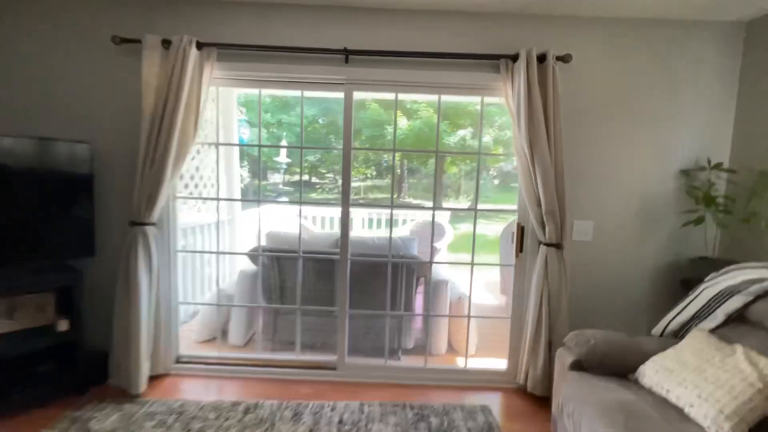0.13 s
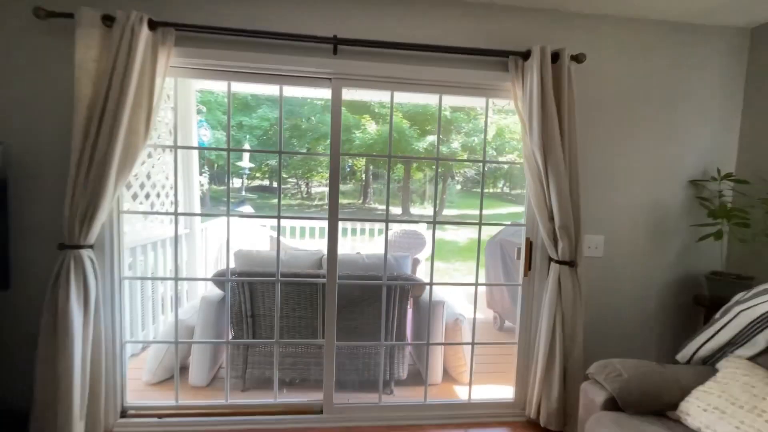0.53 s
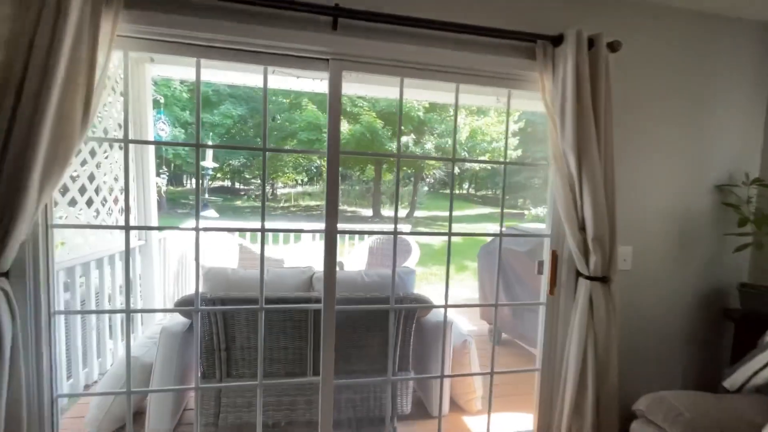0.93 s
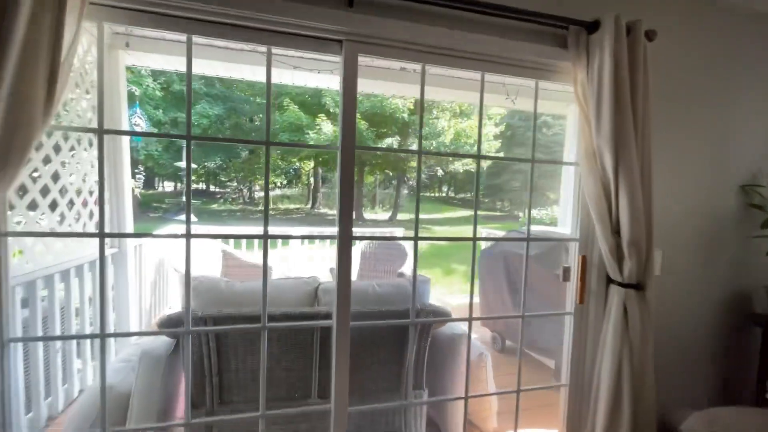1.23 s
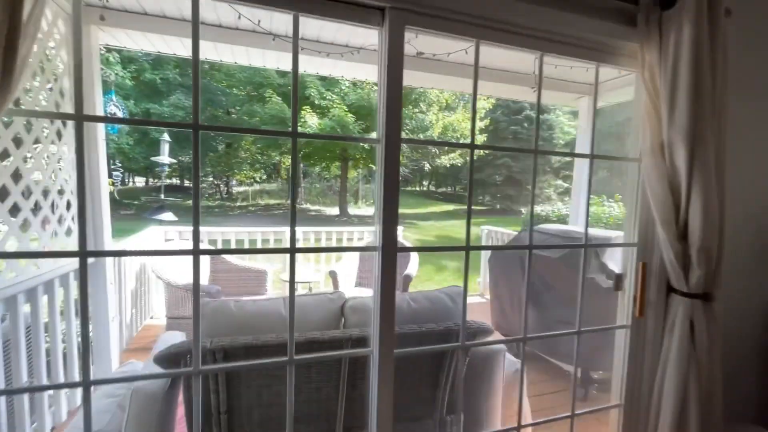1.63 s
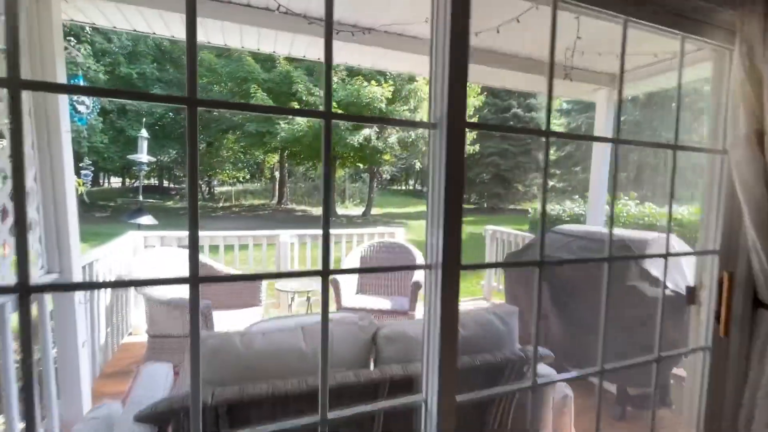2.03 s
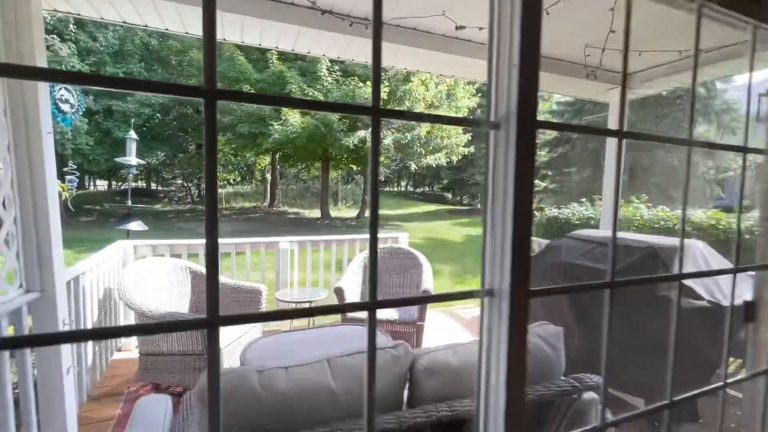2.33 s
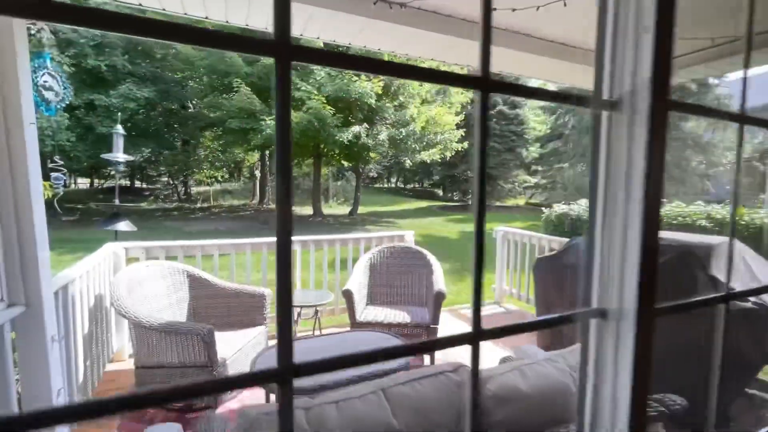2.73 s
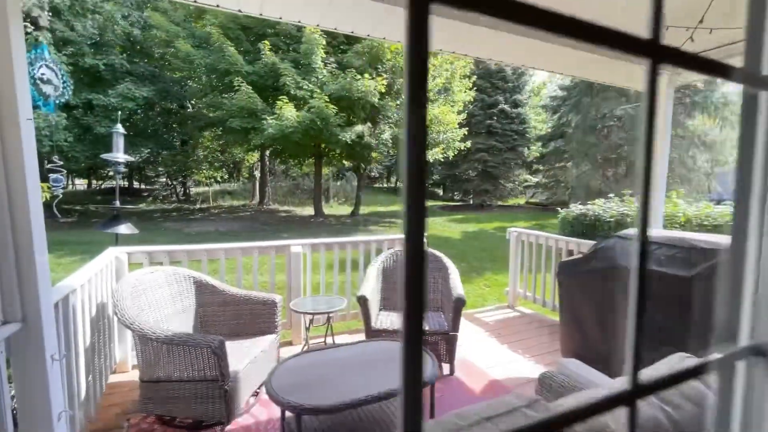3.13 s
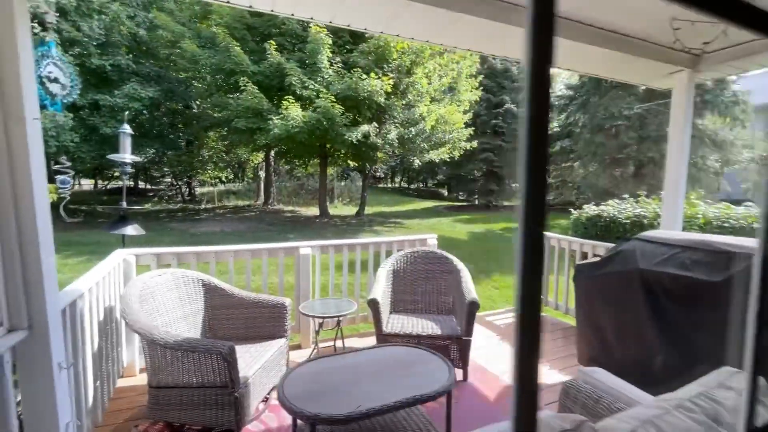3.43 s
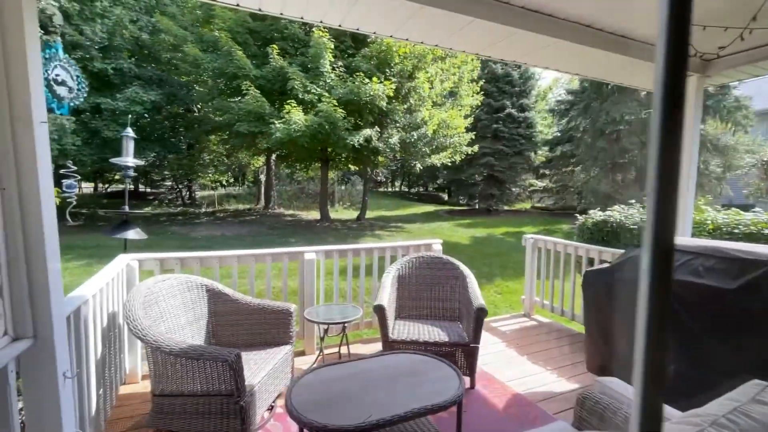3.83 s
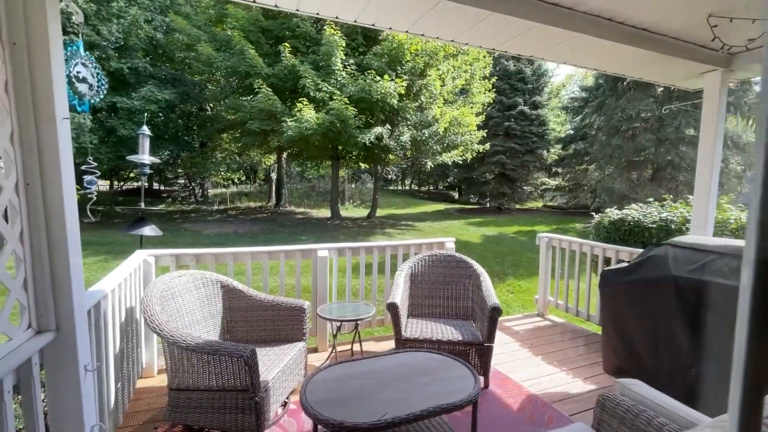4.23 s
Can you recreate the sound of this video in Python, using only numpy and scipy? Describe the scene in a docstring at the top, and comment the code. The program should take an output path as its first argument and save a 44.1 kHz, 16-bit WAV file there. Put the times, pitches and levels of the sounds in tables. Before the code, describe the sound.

One loud hollow door thud with low rumbling ring, then someone quietly shuffling across the floor with soft knocks and brushing over faint hiss.

```python
"""Door slam and slow steps

A door out of sight swings shut in a quiet house: its hinge squeaks as a wavering tone, air rushes, the latch and
leaf rattle as shaped noise bursts, and the low room modes ring as damped sines that boom and beat.
Someone then walks slowly over floor and rug: swelling noise makes rustling cloth and soles, short bursts of grit
make scuffs, damped sines make soft knocks in the boards. A faint steady hiss lies under it all."""
import sys
import numpy as np
from scipy import signal
from scipy.fft import rfft, irfft, next_fast_len
from scipy.io import wavfile

SR = 44100
rng = np.random.default_rng(int(sys.argv[2]) if len(sys.argv) > 2 else 0)


def digitize_waveform(pressure):
    """Quantize a signal to 16-bit integers and store it at the path in sys.argv[1].

    Rows of a 2-D input are taken as channels; values are limited to [-1, 1].
    """
    field = np.atleast_2d(pressure).T
    bounded = np.clip(field, -1, 1)
    quanta = np.round(bounded * 32767).astype(np.int16)
    wavfile.write(sys.argv[1], SR, quanta)


N = 193863
T = np.arange(N) / SR


def from_db(db):
    """Decibels to gain."""
    return 10 ** (np.asarray(db) / 20)


def rms_one(x):
    """Scale to rms 1."""
    return x / np.sqrt(np.mean(x ** 2) + 1e-30)


def in_time(rows):
    """Columns of a table, joined by straight lines in time."""
    s, *columns = np.transpose(rows)
    return [np.interp(T, s, c) for c in columns]


def at_hz(points, hz):
    """A spectrum read on a log-frequency axis."""
    p = np.array(points, float)
    return np.interp(np.log(np.maximum(hz, 1)), np.log(p[:, 0]), p[:, 1])


def colour(x, spectrum):
    """Filter by a spectrum in dB."""
    length = x.shape[-1]
    size = next_fast_len(length)
    gain = from_db(at_hz(spectrum, np.fft.rfftfreq(size, 1 / SR)))
    return irfft(rfft(x, size) * gain, size)[..., :length]


def drift(rate_hz):
    """Slow chance with spread 1: noise through two equal low-pass poles, computed every 40 samples."""
    r = np.exp(-2 * np.pi * rate_hz * 40 / SR)
    noise = rng.standard_normal(N // 40 + 2002)
    slow = signal.lfilter([1], [1, -2 * r, r * r], noise)[2000:]   # settled part only
    return np.interp(np.arange(N) / 40, np.arange(len(slow)), rms_one(slow))


def ring(x, hz, t60):
    """A unit click sets a sine of height 1 ringing; it falls 60 dB in t60 seconds."""
    r, w = from_db(-60 / (t60 * SR)), 2 * np.pi * hz / SR
    return signal.lfilter([0, np.sin(w)], [1, -2 * r * np.cos(w), r * r], x + 1e-18)


def resonance(x, hz, width):
    """One peak with gain 1 on top, its width in Hz."""
    r = np.exp(-np.pi * width / SR)
    feedback = [1, -2 * r * np.cos(2 * np.pi * hz / SR), r * r]
    return signal.lfilter(np.array([1, 0, -1]) * (1 - r * r) / 2, feedback, x)


def burst(start, t60, rise_s, span=slice(None)):
    """Envelope: silent, a quick rise, an even fall in dB."""
    t = np.maximum(T[span] - start, 0)
    return (1 - np.exp(-t / rise_s)) * from_db(-60 * t / t60)


def after(s):
    """The samples in which a short sound from s on is heard."""
    return slice(int(s * SR), int((s + .6) * SR))


def swells(arrive_s, rise_s, hold_s, fall_s, level_db):
    """Power of each swell (rows) every 32 samples: an even rise in dB, a hold, an even fall."""
    columns = (arrive_s, rise_s, hold_s, fall_s, level_db)
    arrive, rise, hold, fall, level = (np.reshape(c, (-1, 1)) for c in columns)
    t = T[::32] - arrive
    drop_db = 20 * (np.maximum(-t, 0) / rise + np.maximum(t - hold, 0) / fall)
    return from_db(2 * (level - drop_db))   # twice the dB gives power


def together(powers):
    """Overlapping swells add in power; returns a gain."""
    return np.interp(T, T[::32], np.sqrt(powers.sum(axis=0)))


# how alike left and right microphone hear diffuse sound: freq_hz, likeness (1 same, 0 unrelated, -1 opposed)
LIKENESS = [(60, 0.23), (130, 0.91), (290, 0.7), (640, -0.2), (1410, -0.13), (3100, 0.0065), (6820, -0.33),
            (15000, 0.25)]


def stereo_noise(size):
    """White noise in two channels, mixed from mid and side: most alike in the bass, little in the treble."""
    mid, side = rfft(rng.standard_normal((2, size)))
    alike = np.clip(at_hz(LIKENESS, np.fft.rfftfreq(size, 1 / SR)), -1, 1)
    return irfft(np.sqrt(1 + alike) * mid + np.sqrt(1 - alike) * side * np.array([[1], [-1]]), size)


def grainy(spectrum, grain_db=0, rate_hz=4):
    """Coloured stereo noise, rms 1; any grain makes its strength flicker like fibres catching."""
    return rms_one(colour(stereo_noise(N) * from_db(grain_db * drift(rate_hz)), spectrum))


# how long the house rings, before the stretch each sound gives it: freq_hz, t60_s
HOUSE = [(150, 0.58), (400, 0.76), (1040, 0.63), (2760, 0.55), (7280, 0.42)]


def room(x, stretch, build_s):
    """Diffuse echoes: noise that builds up, then dies band by band; energy 1 per channel."""
    t, white, echoes = T[:SR], stereo_noise(SR), 0
    edges = 25 * 2 ** np.arange(1.5, 9.6, .5)   # half octaves, Hz
    for low, high in zip(edges, edges[1:]):
        band = signal.sosfilt(signal.butter(2, [low, high], "band", fs=SR, output="sos"), white)
        fade = from_db(-60 * t / (stretch * at_hz(HOUSE, np.sqrt(low * high))))
        echoes = echoes + band * fade / np.sqrt(np.sum(fade ** 2))
    echoes = echoes * (1 - np.exp(-t / build_s))
    return signal.fftconvolve(np.atleast_2d(x), echoes / np.sqrt(np.sum(echoes ** 2) / 2), axes=1)[:, :N]


# hinge squeak, out of sight: time_s, pitch_hz, level_db and octave_db (both before the flutter's 2.5 dB lift)
SQUEAK = [(0, 5130, -54, -80), (.05, 5200, -51, -67), (.1, 5225, -57, -71), (.14, 5235, -63, -86),
          (.22, 5225, -72, -100)]


def squeak():
    """Uneven slipping in the hinge: a thin wavering tone and its octave, fluttering apart at the two ports."""
    hz, level_db, octave_db = in_time(SQUEAK)
    wander = 1.2 * np.array([drift(25), drift(25)])   # radians, one row per port
    phase = 2 * np.pi * np.cumsum(hz + 30 * drift(120)) / SR + wander
    tone = from_db(level_db) * np.sin(phase) + from_db(octave_db) * np.sin(2 * phase)
    return tone * from_db(2.5 + 2.0 * drift(48)) * (T < SQUEAK[-1][0])


# colour of the faint hiss under the quiet house: freq_hz, relative_db
HISS = [(59, -48.5), (100, -9), (150, 3), (166, -11.5), (461, -16), (521, -12), (2350, -17.5),
        (2600, -17.5), (3680, -26.5), (8480, -19.5), (13000, -34.5)]


def hiss():
    """Steady coloured noise at one faint level."""
    return from_db(-76) * grainy(HISS)


# the leaf swings: time_s, push_db on the lowest room modes, rush_db of air
SWING = [(0, -105, -60), (.09, -89, -52.5), (.14, -74, -55), (.2, -69.5, -55), (.25, -71.5, -46.5),
         (.45, -120, -65.5)]
# colour of the rushing air: freq_hz, relative_db
RUSH = [(70, -35.5), (120, -8), (230, -4), (1300, -7.5), (3500, -19), (5600, -21), (10500, -31),
        (12500, -58.5)]


def rush():
    """Air swept by the leaf: coloured noise that follows the swing."""
    return from_db(in_time(SWING)[1]) * grainy(RUSH) * (T < SWING[-1][0])


# low modes of the rooms: pitch_hz, level_db of a 0 dB thump, t60_s, sign where the microphone stands
ROOM_MODES = [(36.1, -30.9, 1.68, -1), (42.9, -34.6, 2.02, 1), (50.9, -35.9, 2.07, -1),
              (57.7, -29, 1.79, 1), (72.3, -33.3, .58, 1), (89.4, -6.5, .24, -1), (94.1, -3.3, .46, 1),
              (105, -15.5, .27, -1)]
# the leaf lands and rebounds: time_s, push_db
THUMPS = [(.2237, -28.3), (.2594, 2.3), (.2754, 2.4), (.3332, -7)]


def boom():
    """The leaf pushes air while it swings and thumps it as it lands; the room modes ring and beat."""
    swing = from_db(in_time(SWING)[0]) * rng.standard_normal(N) * (T < SWING[-1][0])
    thumps = np.zeros(N)
    for s, push_db in THUMPS:
        thumps[round(s * SR)] = from_db(push_db)
    modes = []
    for hz, level_db, t60, sign in ROOM_MODES:
        drive = swing * (hz < 60) + from_db(level_db) * thumps   # the swing moves only the lowest modes
        modes.append(sign * ring(drive, hz, t60))
    across = from_db(-18.0) * (modes[3] - modes[2] + .8 * modes[7])   # modes that differ between the two ports
    return sum(modes) + across * np.array([[1], [-1]])


# rumble in the floor structure while someone walks: time_s, level_db
RUMBLE = [(1.9, -66.5), (2.05, -74.5), (2.2, -84), (2.43, -67), (2.83, -75), (2.9, -82), (3.06, -70),
          (3.23, -80), (3.36, -71), (3.67, -65.5), (3.8, -80.5), (3.99, -65.5), (4.22, -69.5),
          (4.39, -79.5)]
# colour of the joists: freq_hz, relative_db
JOISTS = [(16, -39), (28, -10), (54, 0), (92, -3), (110, -6.5), (140, -29.5), (240, -120)]


def rumble():
    """Low flickering noise in the joists, fading in from the start until the first row of its table."""
    fade_in = np.clip(T / RUMBLE[0][0], 0, 1)
    return fade_in * from_db(in_time(RUMBLE)[0]) * grainy(JOISTS, grain_db=2.0, rate_hz=7.6)


# contacts of the door with the frame: start_s, relative_db, rattle t60_s, bass_db (gain in the bass)
CONTACTS = [(0.2154, -20.5, 0.29, -13.5), (0.252, -12, 0.085, 2.5), (0.265, -14, 0.12, 7),
            (0.291, -23.5, 0.49, 3.5)]
# resonances of the leaf: pitch_hz, width_hz, peak_db over the rattle
DOOR_MODES = [(150, 12, 7), (199.5, 8.3, 6), (226.5, 34, -3), (345, 12, 1.5), (387, 14, 8), (1527, 89, 5.5)]
# colour of the slam: freq_hz, relative_db
DOOR = [(74, -31), (125, -7.5), (312, -17), (381, -22.5), (421, -21.5), (1010, -23.5), (1090, -21.5),
        (1310, -21.5), (1950, -25.5), (3010, -25.5), (9360, -33), (11900, -49.5), (14500, -56)]


def slam():
    """Each contact rattles latch and leaf; the first arrivals are sharp, then the house carries it on."""
    chatter_db = np.clip(2.5 * drift(90) + 2.5 * drift(450), -9, 5)   # loose parts chatter unevenly
    chatter = rng.standard_normal(N) * from_db(chatter_db)
    dull = signal.sosfilt(signal.butter(1, 1200, fs=SR, output="sos"), chatter)
    rattle = np.zeros(N)
    for s, level_db, t60, bass_db in CONTACTS:
        tilted = chatter + (from_db(bass_db) - 1) * dull
        rattle += from_db(level_db) * burst(s, t60, rise_s=0.0022) * tilted
    body = rattle + sum(from_db(peak_db) * resonance(rattle, hz, width) for hz, width, peak_db in DOOR_MODES)
    early = from_db(-8.5) * rattle * stereo_noise(N)   # unlike at the two ports
    return from_db(22) * colour(early + room(body, stretch=0.83, build_s=0.0018), DOOR)


BOARD_HZ = np.geomspace(110, 520, 8)   # resonances of the floor


def boards(pitch_hz):
    """The floor's resonances murmur; those nearest the given pitch sound most."""
    load = stereo_noise(N) * from_db(2.8 * drift(5.3))
    murmur = 0
    for hz in BOARD_HZ:
        nearness = np.exp(-(np.log(pitch_hz / hz) / 0.47) ** 2)
        width = 0.45 * hz
        murmur = murmur + nearness * resonance(resonance(load, hz, width), hz, width) / np.sqrt(hz)
    return rms_one(murmur)


# low murmur under the slam's tail (first row), then the walker's weight shifts:
# arrive_s, rise_s (over 20 dB), hold_s, fall_s (over 20 dB), murmur_db, pitch_hz, rub_db
MURMUR_AND_STEPS = [(.5, .05, .05, 1.2, -56, 190, -63), (.922, .012, .04, .2, -60, 200, -58),
                    (1.14, .2, .04, .1, -54, 390, -57.5), (1.25, .05, .02, .22, -61, 158, -73),
                    (1.445, .015, .09, .07, -60, 250, -70), (1.655, .025, .16, .15, -65, 320, -66),
                    (1.75, .2, .05, .15, -61, 320, -61), (1.89, .02, .06, .08, -68, 337, -69),
                    (2.24, .04, .05, .4, -65, 310, -69), (2.38, .14, .04, .2, -51, 410, -56),
                    (2.48, .15, .07, .2, -61, 340, -60), (2.772, .005, .04, .2, -70, 232, -59),
                    (2.97, .25, .03, .2, -65.5, 240, -65), (3.05, .04, .04, .12, -57, 317, -55),
                    (3.125, .015, .05, .2, -62, 200, -50), (3.24, .03, .02, .05, -56, 248, -59),
                    (3.305, .02, .04, .08, -57, 180, -62), (3.4, .1, .05, .2, -65, 200, -62),
                    (3.587, .02, .03, .15, -55, 340, -65), (3.64, .05, .02, .09, -53, 280, -55),
                    (3.936, .005, .1, .2, -59, 190, -72), (4.0, .04, .05, .2, -62, 170, -68)]
# cloth and soles brush: arrive_s, rise_s (over 20 dB), hold_s, fall_s (over 20 dB), rasp_db, swish_db
RUSTLES = [(.69, .05, .05, .3, -67, -67), (.922, .012, .05, .15, -61, -70), (1.14, .2, .04, .25, -68, -77),
           (1.34, .06, .1, .2, -66, -70), (1.66, .05, .15, .3, -76, -84), (1.885, .015, .07, .06, -68, -68),
           (2.22, .02, .06, .2, -72, -68), (2.46, .2, .04, .2, -60.5, -68), (2.54, .03, .03, .3, -62, -68),
           (2.774, .01, .05, .35, -60, -68), (3.05, .04, .03, .15, -59, -74),
           (3.122, .012, .05, .18, -50, -61), (3.305, .012, .03, .25, -58, -69),
           (3.467, .015, .03, .25, -63, -72), (3.587, .025, .03, .08, -54, -63),
           (3.7, .1, .04, .4, -70, -67), (3.96, .01, .13, .08, -67, -78)]
# colours of the dull rub, the drier rasp and the bright swish: freq_hz, relative_db
RUB = [(290, -39), (500, -2), (579, -1.5), (850, 6.5), (1450, -4.5), (1880, -11.5), (3190, -120)]
RASP = [(760, -7.5), (1300, 0.5), (2050, -2), (2410, -3.5), (3300, -14.5), (4290, -15), (7260, -120)]
SWISH = [(1760, -40), (3000, -10.5), (5810, -14), (6300, -13.5), (7760, -17.5), (8970, -14), (12600, -41),
         (13500, -38)]


def murmur_and_walk():
    """A low murmur under the slam's tail, then boards under load; a dull rub, a drier rasp, a bright swish."""
    s, rise_s, hold_s, fall_s, murmur_db, hz, rub_db = np.transpose(MURMUR_AND_STEPS)
    murmur = swells(s, rise_s, hold_s, fall_s, murmur_db) + 1e-30
    pitch_hz = np.interp(T, T[::32], hz @ murmur / murmur.sum(axis=0))   # the strongest swell counts most
    rub = swells(s, rise_s, hold_s, .7 * fall_s, rub_db)   # dies sooner than the murmur
    *shape, rasp_db, swish_db = np.transpose(RUSTLES)
    out = together(murmur) * boards(pitch_hz)
    out += together(rub) * grainy(RUB, grain_db=0.5, rate_hz=26)
    out += together(swells(*shape, rasp_db)) * grainy(RASP, grain_db=1.0, rate_hz=45)
    out += together(swells(*shape, swish_db)) * grainy(SWISH, grain_db=2.0, rate_hz=26)
    return out


# scuffs of a sole: start_s, level_db, pitch_hz of the hollow note, edge_db (bright edge), t60_s of the hollow rasp,
# tap_db relative to level_db
SCUFFS = [(0.917, -61, 1670, -87, 0.14, -1), (1.135, -38, 820, -104, 0.16, -16),
          (1.877, -62, 914, -62, 0.033, 0), (1.889, -46, 845, -58.5, 0.034, -18),
          (2.21, -78, 727, -83, 0.14, -9), (2.452, -46.5, 1590, -72.5, 0.29, -7.5),
          (2.53, -46.5, 1710, -64, 0.077, -7.5), (2.769, -41.5, 829, -70, 0.36, -23),
          (3.118, -54, 1190, -59, 0.1, 4.5), (3.302, -39, 877, -87, 0.1, -10.5),
          (3.466, -51, 1252, -75, 0.15, 1.5), (3.576, -38.5, 1760, -62.5, 0.21, -21),
          (3.64, -45, 650, -77, 0.035, -7), (3.846, -57.5, 2150, -101, 0.084, -9),
          (3.955, -48.5, 2150, -94, 0.45, -13.5), (4.018, -61, 2395, -94, 0.078, -2)]


def scuffs():
    """Sudden bursts of grit: a sine tap, a hollow rasp at its pitch, and a bright edge that dies more slowly."""
    rise_s, pan_db, grit_db = 0.00068, 3, -18   # left over right; rasp relative to level_db
    out, grit = np.zeros(N), rng.standard_normal(N) * from_db(3.3 * drift(290))
    edge = rms_one(colour(grit, SWISH))
    for s, level_db, hz, edge_db, t60, tap_db in SCUFFS:
        width, span = .3 * hz, after(s)
        hollow = rms_one(resonance(resonance(grit[span], hz, width), hz, width))
        rasp = from_db(grit_db) * hollow * burst(s, t60, rise_s, span)
        tap = from_db(tap_db) * np.sin(2 * np.pi * hz * (T[span] - s)) * burst(s, 0.082, 0.00057, span)
        out[span] += from_db(level_db) * (tap + rasp)
        out[span] += from_db(edge_db) * edge[span] * burst(s, 2.1 * t60, rise_s, span)
    return from_db(pan_db / 2 * np.array([[1], [-1]])) * out


# knocks in the boards: start_s, level_db, pitch_hz, t60_s
KNOCKS = [(0.927, -48, 97, 0.18), (1.444, -42.5, 144, 0.1), (1.465, -38.5, 152, 0.11),
          (1.889, -49, 350, 0.047), (2.325, -47, 334, 0.088), (2.395, -40.5, 453.3, 0.14),
          (2.543, -48.5, 322, 0.061), (3.055, -47, 328.6, 0.12), (3.237, -31, 342, 0.016),
          (3.242, -37, 228, 0.04), (3.302, -42, 179, 0.1), (3.586, -48, 431, 0.08),
          (3.622, -48.5, 330, 0.15), (3.641, -34, 447, 0.033), (3.933, -45, 192, 0.067),
          (4.018, -34, 183, 0.027)]


def knocks():
    """A soft contact, lasting most of one swing, sets a board ringing briefly at its own pitch."""
    out = np.zeros(N)
    for s, level_db, hz, t60 in KNOCKS:
        span = after(s)
        tone = np.sin(2 * np.pi * hz * (T[span] - s))
        out[span] += from_db(level_db) * tone * burst(s, t60, .8 / hz, span)
    return out


# faint narrow bands of noise: start_s, level_db, centre_hz, t60_s
NARROW_BANDS = [(1.33, -68, 6300, .6), (3.655, -64, 5400, .35)]


def narrow_bands():
    """Noise twice through a narrow resonance, swelling softly and dying away."""
    noise, out = stereo_noise(N), 0
    for s, level_db, hz, t60 in NARROW_BANDS:
        band = rms_one(resonance(resonance(noise, hz, 700), hz, 700))
        out = out + from_db(level_db) * band * burst(s, t60, rise_s=.015)
    return out


def scene():
    """Door, walker and the quiet house; scuffs and knocks also wake a short room echo."""
    door = squeak() + rush() + boom() + slam()
    steps = scuffs() + knocks()
    steps += from_db(-0.5) * room(steps.mean(axis=0), stretch=0.23, build_s=0.00063)
    return door + hiss() + rumble() + murmur_and_walk() + steps + narrow_bands()


# the microphone's two ports: freq_hz, left_over_right_db
PORTS = [(60, -1.5), (700, 1.5), (1800, -0.5), (6400, 1.5), (7800, -2.5), (9800, -13), (12500, 4)]


def record(dry):
    """The two ports hear the spectrum unequally, most in the treble; a steep low-pass cuts the top."""
    left = colour(dry[0], [(hz, db / 2) for hz, db in PORTS])
    right = colour(dry[1], [(hz, -db / 2) for hz, db in PORTS])
    low_pass = signal.cheby2(12, 70, 15700, fs=SR, output="sos")   # 70 dB down from 15700 Hz up
    return signal.sosfilt(low_pass, [left, right])


dry = scene()
out = record(dry)
digitize_waveform(out)
```